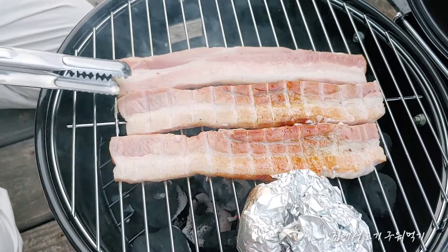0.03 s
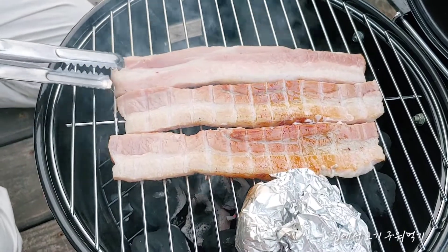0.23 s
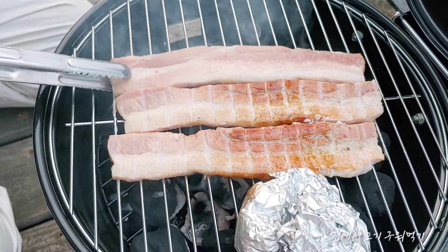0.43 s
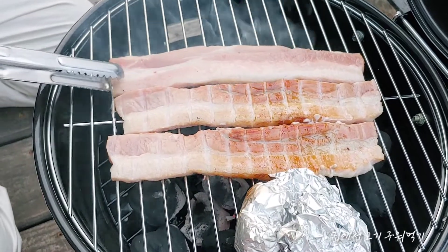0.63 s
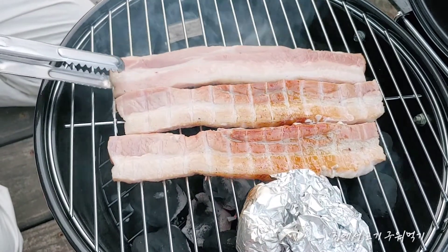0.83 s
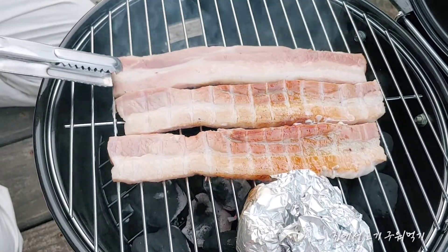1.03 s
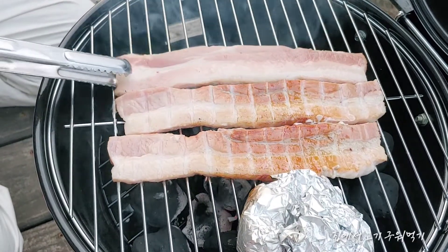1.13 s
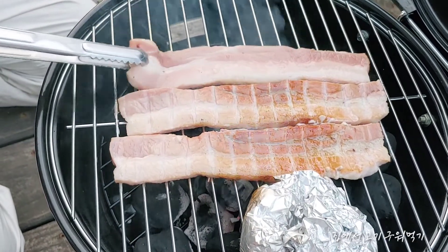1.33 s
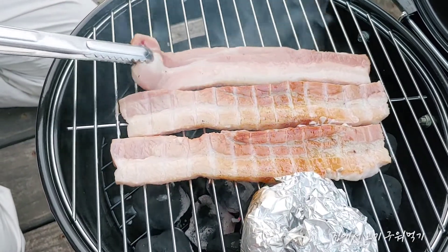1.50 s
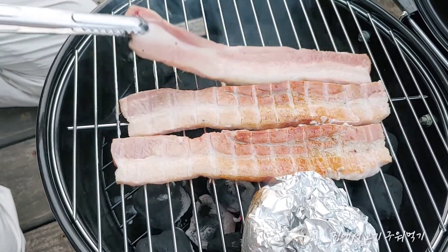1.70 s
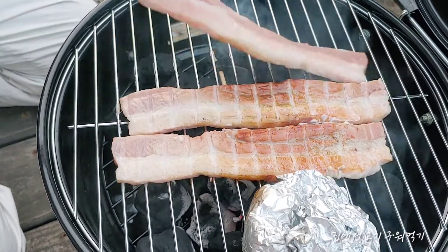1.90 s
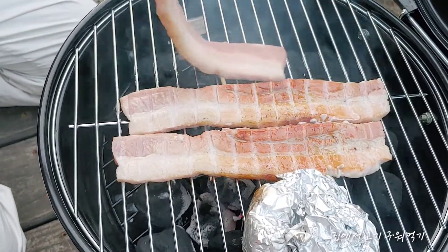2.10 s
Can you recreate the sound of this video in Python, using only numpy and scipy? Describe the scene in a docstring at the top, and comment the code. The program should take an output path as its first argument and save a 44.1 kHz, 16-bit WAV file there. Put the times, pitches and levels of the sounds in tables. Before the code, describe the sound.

Metal tongs clink and scrape several times against a nearby barbecue grate, lightly shaking its bars. Meat sizzles throughout above a low outdoor rumble; later, fat pops, steam squeaks briefly and the grate gives one faint clunk.

```python
"""Steel tongs pick at a strip of pork on a charcoal grill outdoors.
From the start, tiny bubbles of fat sizzle over a low outdoor rumble. From about 0.2 to 1.1 s the jaws
clack and skid on the grate and ring briefly, and heavier pushes shake its bars and the bowl.
Short sharp ticks stand out: a faint touch of the tongs at 0.46 s, then spits of fat.
Near 1.5 s steam squeaks out as the strip is peeled off; one last faint clunk follows under the sizzle."""
import sys
import numpy as np
from scipy import signal
from scipy.fft import rfft, irfft, next_fast_len
from scipy.io import wavfile

SR = 44100
rng = np.random.default_rng(int(sys.argv[2]) if len(sys.argv) > 2 else 0)


def generate_wav(signal):
    """Clip the signal to [-1, 1] and save it as 16-bit WAV at the path in sys.argv[1]."""
    frames = np.transpose(np.atleast_2d(signal))
    scaled = np.clip(frames, -1, 1) * 32767
    pcm = np.round(scaled).astype(np.int16)
    wavfile.write(sys.argv[1], SR, pcm)


N = 94815
TIME = np.arange(N) / SR


def from_db(db):
    """Decibels to gain."""
    return 10 ** (np.asarray(db) / 20)


def unit_rms(x):
    """Scale to rms 1."""
    return x / np.sqrt(np.mean(x ** 2) + 1e-20)


def unit_burst(x):
    """Scale each channel of a burst to the energy of 10 ms at rms 1."""
    return x * np.sqrt(.01 * SR / np.sum(x ** 2, axis=-1, keepdims=True))


def at_hz(points, hz):
    """Read a table on a log-frequency axis."""
    freqs, values = np.transpose(points)
    return np.interp(np.log(np.maximum(hz, 1)), np.log(freqs), values)


def automation(rows):
    """Join timed breakpoints with straight ramps, one curve per value column."""
    times, *columns = np.transpose(rows)
    return [np.interp(TIME, times, column) for column in columns]


def below(hz, edge_hz):
    """Soft shelf: 1 under the edge, 0 over it."""
    return 1 / (1 + (hz / edge_hz) ** 12)


def eq(x, points):
    """Minimum-phase filter through (freq_hz, gain_db) points."""
    size = 2 * next_fast_len(x.shape[-1])
    gain = from_db(at_hz(points, np.fft.rfftfreq(size, 1 / SR)))
    cepstrum = irfft(np.log(gain))
    cepstrum[1:size // 2] *= 2
    cepstrum[size // 2 + 1:] = 0
    return irfft(rfft(x, size) * np.exp(rfft(cepstrum)))[..., :x.shape[-1]]


def stereo_noise(size, correlation=0.31):
    """Wide white noise: one part shared by both sides, one part each side's own."""
    noise = rng.standard_normal((3, size))
    return np.sqrt(correlation) * noise[0] + np.sqrt(1 - correlation) * noise[1:]


def place(out, start_s, sound, pan_db):
    """Mix a sound in at start_s; pan_db is left minus right."""
    start = int(start_s * SR)
    panned = sound[:, :N - start] * from_db([[pan_db / 2], [-pan_db / 2]])
    out[:, start:start + panned.shape[1]] += panned


# Tone of the outdoor bed: freq_hz, gain_db
RUMBLE_EQ = [(20, -1), (60, 1), (120, -2), (175, -4), (210, -12.5), (300, -13), (450, -22), (550, -15.5),
             (780, -21), (930, -20), (1500, -33), (3300, -72)]
# Its slow swells: time_s, level_db
RUMBLE_FADER = [(0, -47.5), (.16, -44.5), (.26, -49.5), (.5, -46), (.9, -44.5), (1.15, -46.5), (1.55, -49),
                (1.8, -46.5), (2.15, -49.5)]
# Its stereo image: freq_hz, correlation (1 is mono)
RUMBLE_IMAGE = [(30, 0.95), (150, 0.99), (350, 0.82), (800, 0.3), (1500, 0)]


def rumble():
    """Low outdoor bed, nearly mono in the bass and wider higher up."""
    level_db, = automation(RUMBLE_FADER)
    correlation = at_hz(RUMBLE_IMAGE, np.fft.rfftfreq(N, 1 / SR))
    mid, side = rfft(rng.standard_normal((2, N)))
    pair = irfft(np.sqrt(1 + correlation) * mid + np.sqrt(1 - correlation) * side * [[1], [-1]], N)
    return from_db(level_db) * unit_rms(eq(pair, RUMBLE_EQ))


# Rise and fall of the frying fat: time_s, gain_db
SIZZLE_FADER = [(0.0, -33), (0.25, -30.5), (0.38, -28.5), (0.79, -33.5), (0.95, -31), (1.31, -34.5),
                (1.78, -34.5), (2.15, -37)]
# Its bright tone: freq_hz, gain_db
SIZZLE_EQ = [(400, -31.5), (1600, -21), (3300, -21), (4400, -13), (5400, -10.5), (6300, -2), (6800, -9),
             (7350, 4), (8300, -2), (10000, -8), (11500, -17), (13000, -22.5), (15800, -40)]


def sizzle(bubbles_per_s=420, spread_db=3.5, decay_s=0.0015, crackle_db=-5, hiss_db=-4):
    """Hundreds of tiny bubbles a second burst over a smooth hiss."""
    gain_db, = automation(SIZZLE_FADER)
    pops = rng.random(N) < bubbles_per_s / SR
    sizes = from_db(spread_db * np.minimum(rng.exponential(1, N), 4))
    power = signal.lfilter([1], [1, -np.exp(-2 / (decay_s * SR))], (pops * sizes) ** 2 + 1e-18)
    crackle = unit_rms(np.sqrt(power) * stereo_noise(N))
    fizz = from_db(crackle_db) * crackle + from_db(hiss_db) * stereo_noise(N)
    return from_db(gain_db) * np.std(fizz) * unit_rms(eq(fizz, SIZZLE_EQ))


def jaw_slips(t, skid_s, ticks_per_s=250, rattle_db=3.5, rattle_fade_s=0.013, tick_s=0.00029):
    """The jaw presses and slides off in tiny slips, rattling against the bars in ever weaker ticks."""
    attack_s = 0.0004 + 0.61 * skid_s  # longer skids take longer to build up
    skid = (1 - np.exp(-t / attack_s)) * np.exp(-t / skid_s)
    ticks = (rng.random(len(t)) < ticks_per_s / SR) * np.exp(-t / rattle_fade_s)
    rattle = signal.lfilter([1], [1, -np.exp(-1 / (tick_s * SR))], ticks + 1e-18)
    pressure = skid / skid.max() + from_db(rattle_db) * rattle
    grain_db = 7 * np.minimum(rng.standard_normal(len(t)), 2)
    return pressure * from_db(grain_db) * stereo_noise(len(t))


def touch_tone_db(hz, knock_db, clang_hz, clang_db, bite_db):
    """Where and how hard the jaws touch weights the low knock, the middle clang and the bright bite."""
    knock = below(hz, edge_hz=4530)
    clang = np.exp(-.5 * ((hz - clang_hz) / 630) ** 2)
    bite = 1 - below(hz, edge_hz=8600)
    return knock_db * knock + clang_db * clang + bite_db * bite


# Jaws hit the grate: start_s, gain_db, skid_s, ring_db, knock_db, clang_hz, clang_db, bite_db, pan_db
TONG_HITS = [(0.238, -2.5, 0.0017, -4.5, -6.5, 5500, 3.5, -1, 2),
             (0.3608, -9.5, 0.0098, -6.5, 0, 3950, 11.5, 0, -4.5),
             (0.3882, -8, 0.0058, -9, 0.5, 4200, 10, -3.5, -2),
             (0.4708, -6.5, 0.0055, -7, -4.5, 4600, 4.5, 1.5, 1),
             (0.498, -6.5, 0.0028, -7.5, -2.5, 4580, 5, 4.5, 1),
             (0.511, -16, 0.0055, -3, 1, 4400, 2.5, -3, -4.5),
             (0.5734, -11.5, 0.0031, -18, -8.5, 4500, 2.5, -5.5, -2.5),
             (0.5826, -22.5, 0.0011, -26, -17, 4500, 2, 8, 8),
             (0.723, -24.5, 0.0072, -2, -9, 4660, -3, -6, -4),
             (0.7564, -15, 0.0014, -14.5, -10.5, 4500, -8, -6, -3.5),
             (0.8165, -17.5, 0.0037, 0, -5, 4370, 9, 8, -2.5),
             (0.835, -11, 0.0066, -8.5, 5.5, 4250, 13.5, 4, -4),
             (0.887, -23.5, 0.0051, -2, 2, 4500, 14.5, -7, -4.5),
             (1.039, -18, 0.0027, 0, -5, 4500, -2, -10.5, 9),
             (1.0504, -8, 0.0067, -4.5, -3, 4730, 12.5, 4, -1),
             (1.0850, -23.5, 0.018, -1.5, 5.5, 4540, 11.5, 1, -2.5)]
# Strongest modes of the steel: pitch_hz, gain_db, t60_s
STRONG_MODES = [(3900, -10, 0.14), (4060, -5.5, 0.046), (4493, -4.5, 0.069), (4906, -13.5, 0.23),
                (5305, -11, 0.16), (5460, -12.5, 0.25), (6250, -4.5, 0.12), (6570, -1, 0.081),
                (7790, 1.5, 0.17), (8140, -4, 0.036), (8650, 4.5, 0.16), (9100, 1.5, 0.085)]
# Tone of the crowd of weaker modes around them, and of the scratch: freq_hz, gain_db
CROWD_EQ = [(250, -25), (900, -23.5), (1500, -30), (2200, -10.5), (3350, -24), (3950, -13), (4700, -12),
            (5600, -13.5), (7700, 7), (9000, 0), (10500, -11.5), (12100, -13.5), (13200, -27.5),
            (15800, -53)]
# How long that crowd rings: freq_hz, t60_s
CROWD_DECAY = [(4300, 0.19), (5500, .2), (8000, 0.09)]


def tongs(crowd_size=110, crowd_mix_db=2, scratch_db=-8.5, detune=.012):
    """Each hit is a short skid, heard as a dry scratch and as the ringing of the steel."""
    out, t = np.zeros((2, N)), TIME[:SR // 4]
    mode_hz, mode_db, t60_s = np.transpose(STRONG_MODES)
    for start_s, gain_db, skid_s, ring_db, *touch, pan_db in TONG_HITS:
        crowd_hz = 250 + 14000 * (np.arange(crowd_size) + rng.random(crowd_size)) / crowd_size
        slips = jaw_slips(t, skid_s)
        # From touch to touch the grip shifts the strong modes, and other weak ones are favoured.
        gripped_hz = mode_hz * (1 + detune * rng.uniform(-0.91, 1, len(mode_hz)))
        strong = steel_modes(gripped_hz, mode_db + touch_tone_db(mode_hz, *touch), t60_s, t)
        uneven_db = 4.5 * np.clip(rng.standard_normal(crowd_size), -2, 1)
        crowd_db = at_hz(CROWD_EQ, crowd_hz) + touch_tone_db(crowd_hz, *touch) + uneven_db
        crowd = steel_modes(crowd_hz, crowd_db, at_hz(CROWD_DECAY, crowd_hz), t)
        steel = unit_rms(strong) + from_db(crowd_mix_db) * unit_rms(crowd)
        ring = unit_burst(signal.fftconvolve(slips, steel, axes=1)[:, :len(t)])
        scratch = unit_burst(eq(slips, np.column_stack([crowd_hz, crowd_db])))
        clack = from_db(ring_db) * ring + from_db(scratch_db) * scratch
        place(out, start_s, from_db(gain_db) * clack, pan_db)
    return out


def steel_modes(hz, db, t60_s, t):
    """Struck steel rings in decaying modes, each with a fresh phase on each side."""
    phase = rng.uniform(0, 2 * np.pi, (2, len(hz)))
    weight = from_db(db) * np.exp(1j * phase)
    poles = 2j * np.pi * hz - np.log(1000) / t60_s
    return (weight @ np.exp(np.outer(poles, t))).real


# Heavier pushes on the grate: start_s, level_db, pitch_hz, t60_s
GRATE_PUSHES = [(.242, -47.5, 938, 0.75), (0.547, -43, 823, 0.15), (.840, -37, 868, 0.17),
                (1.053, -40.5, 306, 0.097), (1.764, -52, 947, .2)]


def clunks(bowl_hz=169.1, bowl_gain_db=-3.5, bowl_t60_s=0.53):
    """A pushed bar of the grate rings at a pitch set by where it is touched; the bowl hums along."""
    out, t = np.zeros((2, N)), TIME[:SR // 2]
    for start_s, level_db, pitch_hz, t60_s in GRATE_PUSHES:
        bar = from_db(level_db - 60 * t / t60_s) * np.sin(2 * np.pi * pitch_hz * t)
        bowl = from_db(level_db + bowl_gain_db - 60 * t / bowl_t60_s) * np.sin(2 * np.pi * bowl_hz * t)
        place(out, start_s, np.tile(bar + bowl, (2, 1)), pan_db=0)
    return out


# A faint touch of the tongs at 0.46 s, then spits of fat: start_s, gain_db, body_db, pan_db
SHARP_TICKS = [(0.46, -22, 7, -9), (0.546, -14, 8, 0), (0.7429, -11, -1, 0), (0.925, -21, -1, 3),
               (1.1529, -17, 11, 0), (1.229, -20.5, 5, -3.5), (1.479, -18, -5, 3), (1.525, -14.5, 3.5, 5),
               (1.6636, -12.5, 0, 2), (1.7628, -14, 12, 1), (1.8463, -19, 7, 0.5), (1.864, -21.5, 13, 6),
               (1.879, -11, 10, -0.5), (1.949, -25, 6, -4), (2.0504, -19, 18, -1.5), (2.099, -18.5, -11, 3)]
# Tone of a tick: freq_hz, gain_db
TICK_EQ = [(300, -23), (2000, -22.5), (3300, -23), (4600, -10.5), (7500, 10.5), (9500, 5.5), (12500, -18.5),
           (15800, -19)]


def sharp_ticks(attack_s=0.00023, decay_s=0.0021, tail_db=-9, tail_s=0.015, trim_db=-13.5):
    """A light tong touch, then bursting drops of fat: each a snap with a short tail from the bowl."""
    out, t = np.zeros((2, N)), TIME[:SR // 20]
    snap = (1 - np.exp(-t / attack_s)) * np.exp(-t / decay_s)
    tail = from_db(tail_db) * np.exp(-t / tail_s)
    for start_s, gain_db, body_db, pan_db in SHARP_TICKS:
        tone = [(hz, db + body_db * below(hz, edge_hz=5500)) for hz, db in TICK_EQ]
        burst = unit_burst(eq((snap + tail) * stereo_noise(len(t)), tone))
        place(out, start_s, from_db(gain_db + trim_db) * burst, pan_db - 0.5)  # nudged right
    return out


# Steam escapes under the meat: time_s, pitch_hz, level_db
STEAM_GLIDE = [(1.44, 4200, -60), (1.453, 4150, -45.5), (1.469, 4000, -41), (1.482, 3450, -55),
               (1.503, 3100, -53), (1.53, 2850, -64)]


def steam_squeak(flutter_hz=250):
    """A breathy whistle of steam that falls in pitch as the gap opens."""
    pitch_hz, level_db = automation(STEAM_GLIDE)
    lowpass = signal.butter(2, flutter_hz, fs=SR, output="sos")
    flutter = signal.sosfilt(lowpass, stereo_noise(N) + 1j * stereo_noise(N))
    phase = 2 * np.pi * np.cumsum(pitch_hz) / SR
    whistle = unit_rms((flutter * np.exp(1j * phase)).real)
    gate = (TIME > STEAM_GLIDE[0][0]) & (TIME < STEAM_GLIDE[-1][0])
    return whistle * from_db(level_db) * gate


def scene():
    """The grill's sound reaches the left side a little late; the rumble lies underneath."""
    left, right = tongs() + clunks() + sharp_ticks() + sizzle() + steam_squeak()
    lag_s = .00027
    late_left = np.interp(TIME - lag_s, TIME, left)
    return np.array([late_left, right]) + rumble()


# Tonal balance of the two microphones: freq_hz, left_minus_right_db
STEREO_TILT = [(200, 0.5), (700, -0.5), (1500, 0.5), (3000, 2), (3900, -4.5), (4700, -10), (5300, -7),
               (6800, -7.5), (7450, -3), (8000, -5), (8900, -7), (10000, -9), (13000, 1)]


def record(dry):
    """Each microphone colours its side; peaks are rounded and the top is cut."""
    left = eq(dry[0], [(hz, db / 2) for hz, db in STEREO_TILT])
    right = eq(dry[1], [(hz, -db / 2) for hz, db in STEREO_TILT])
    ceiling, stopband_hz = .88, 16400
    rounded = ceiling * np.tanh(np.array([left, right]) / ceiling)
    return signal.sosfilt(signal.cheby2(16, 70, stopband_hz, fs=SR, output="sos"), rounded)


dry = scene()
out = record(dry)
generate_wav(out)
```